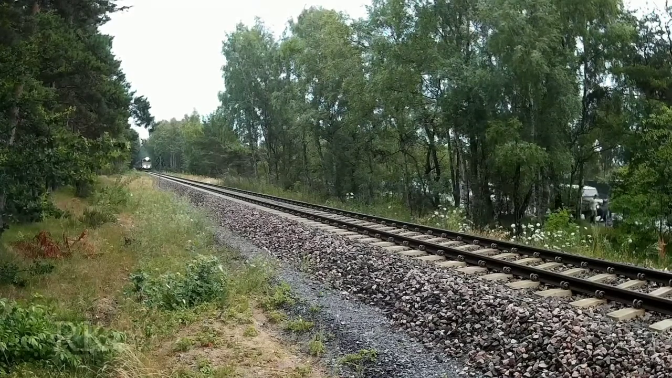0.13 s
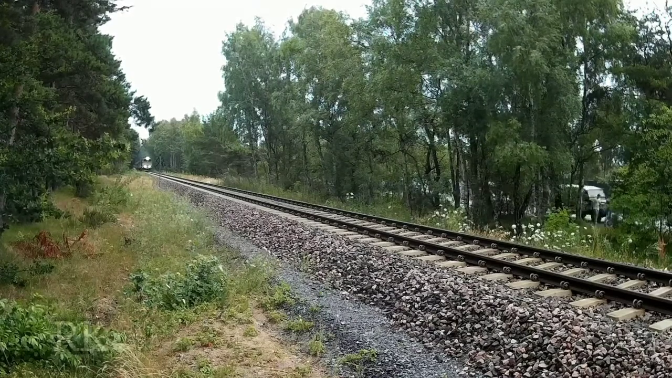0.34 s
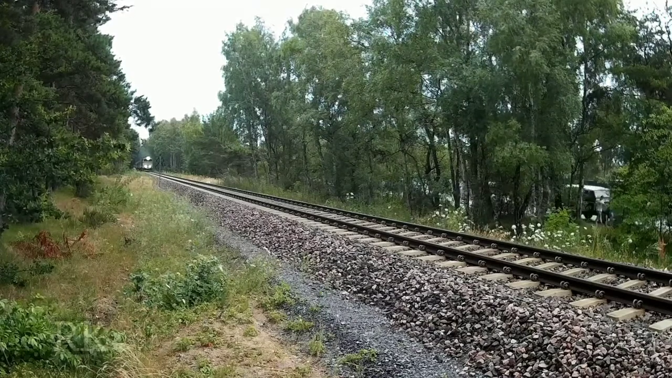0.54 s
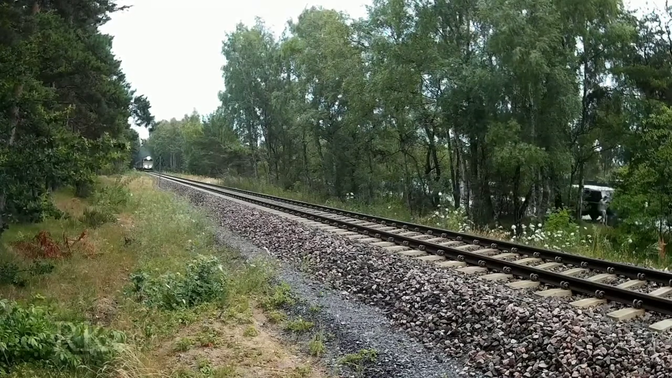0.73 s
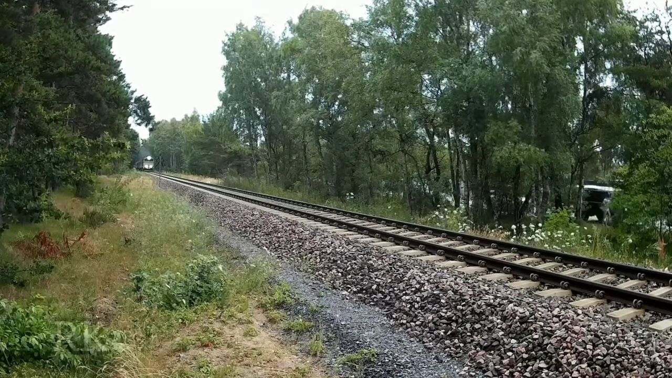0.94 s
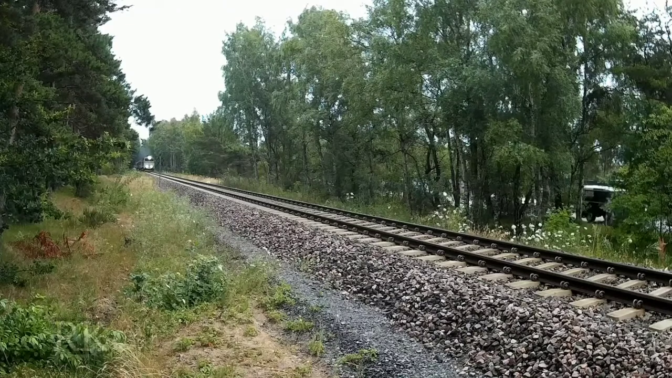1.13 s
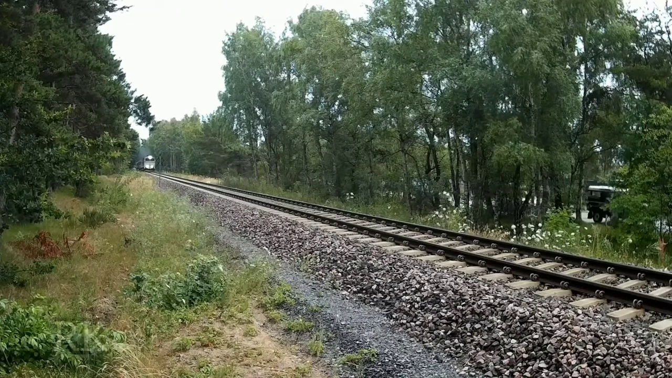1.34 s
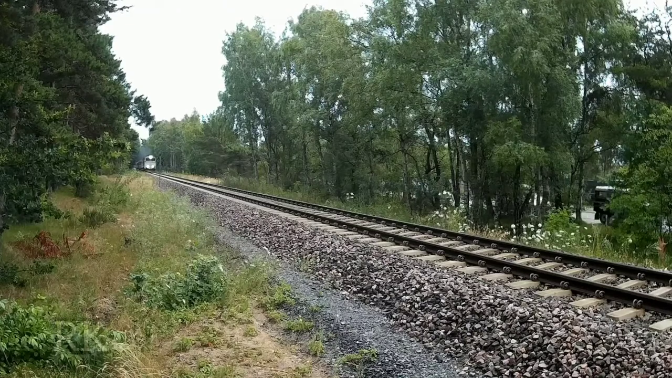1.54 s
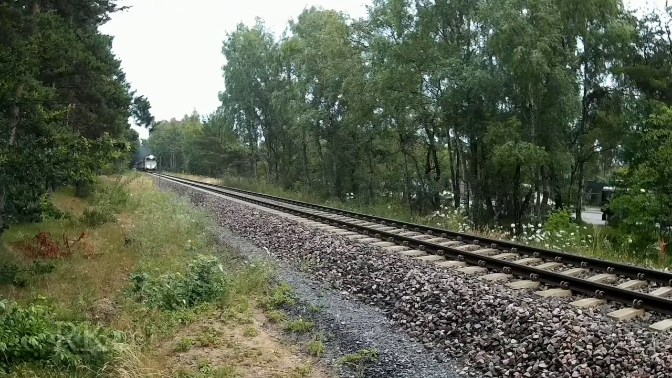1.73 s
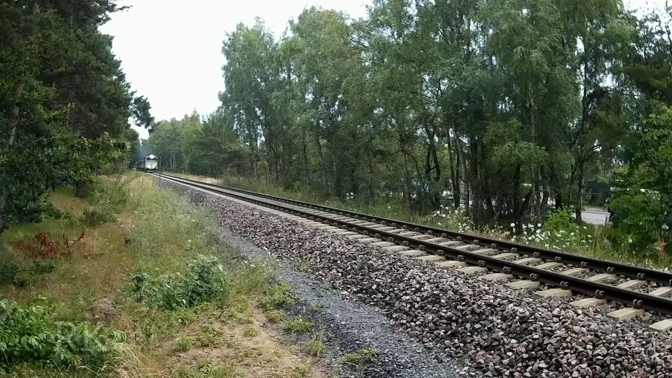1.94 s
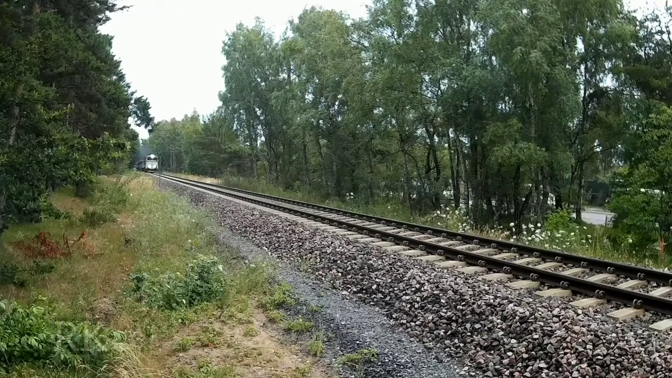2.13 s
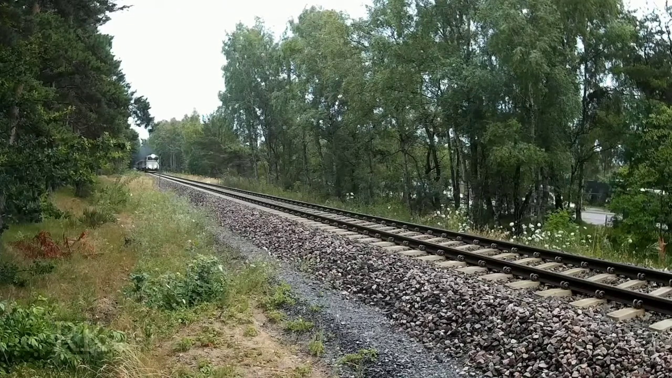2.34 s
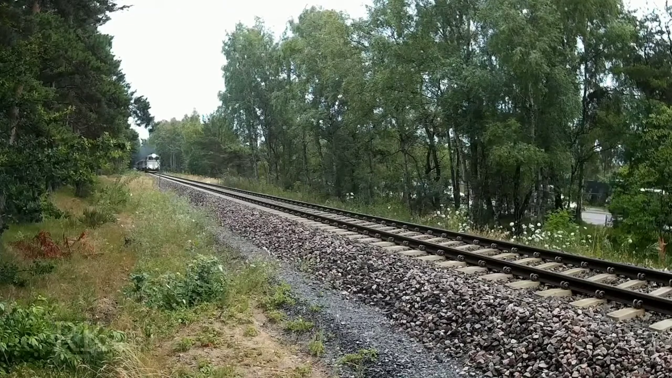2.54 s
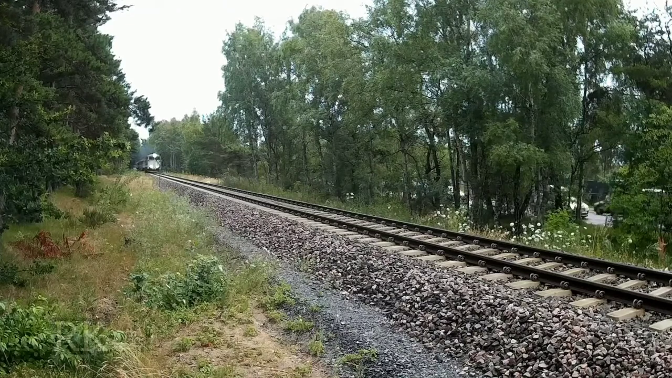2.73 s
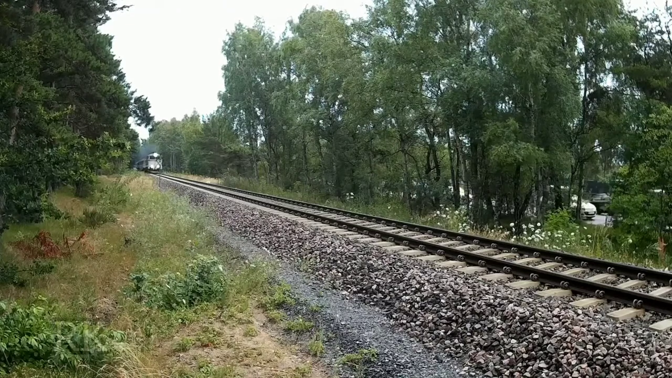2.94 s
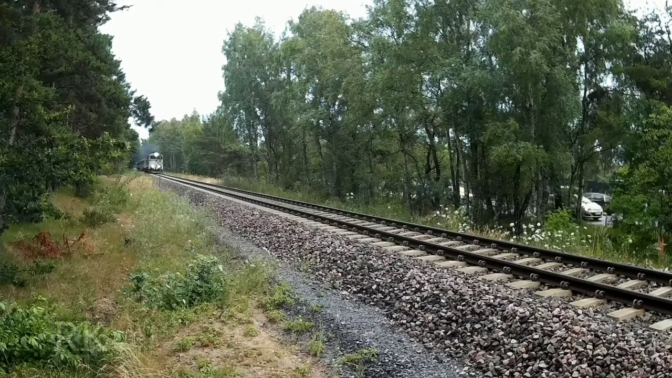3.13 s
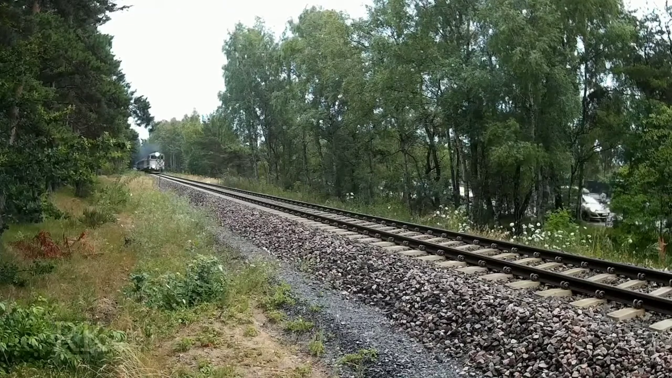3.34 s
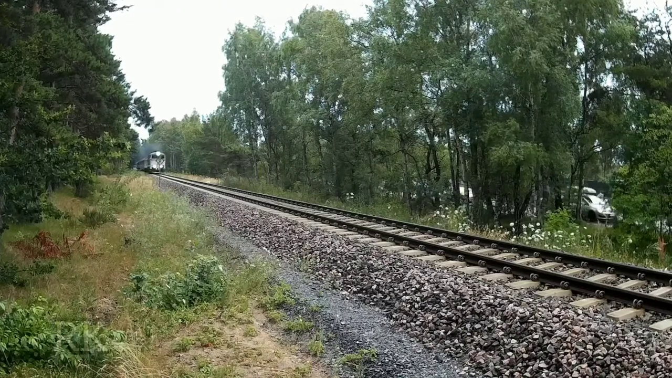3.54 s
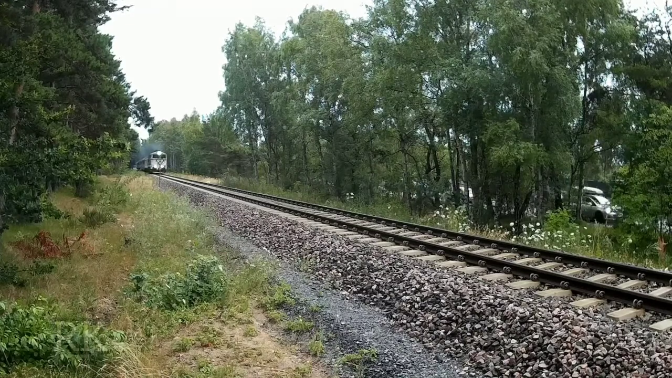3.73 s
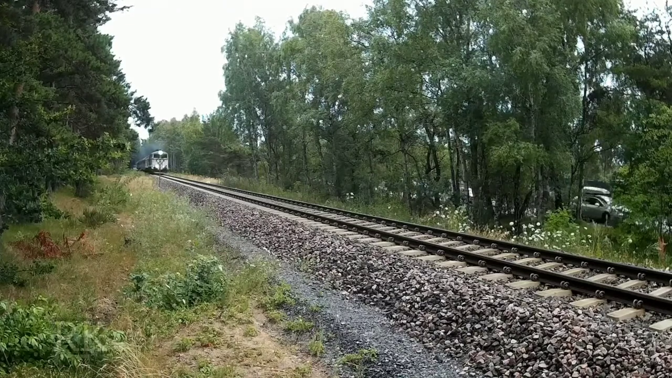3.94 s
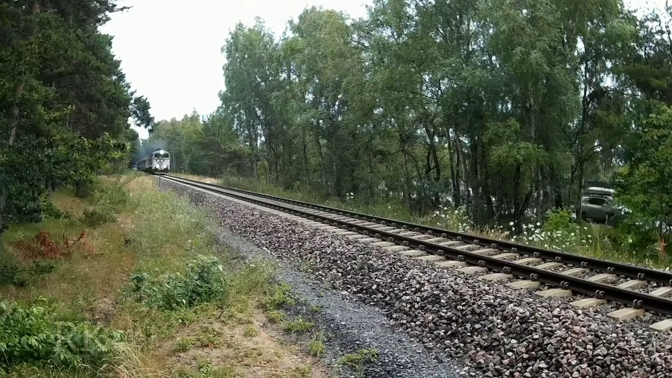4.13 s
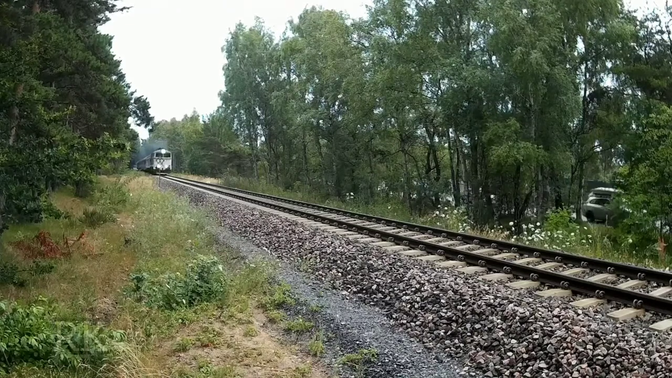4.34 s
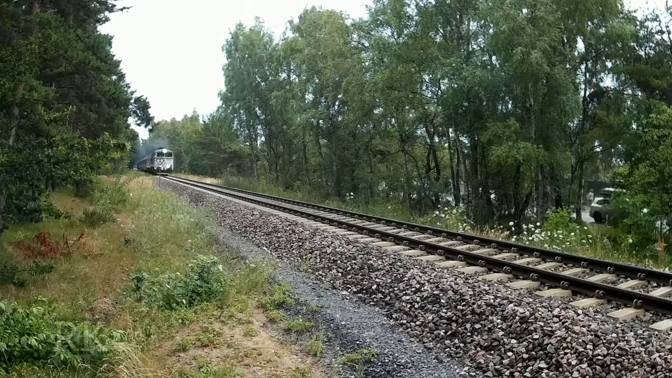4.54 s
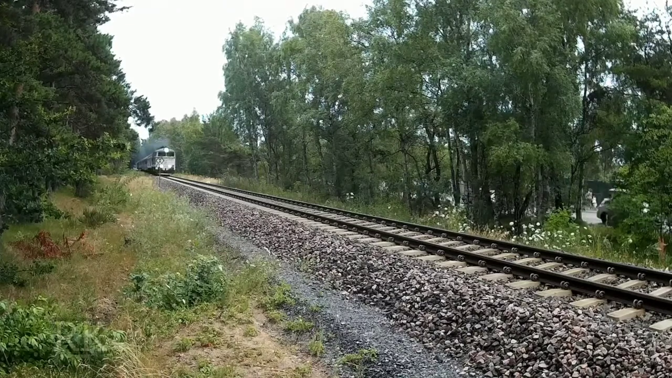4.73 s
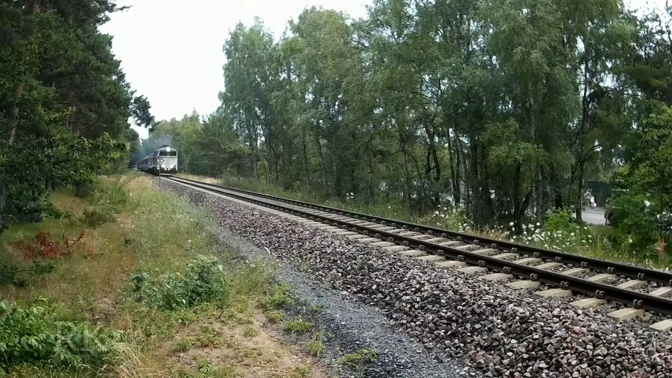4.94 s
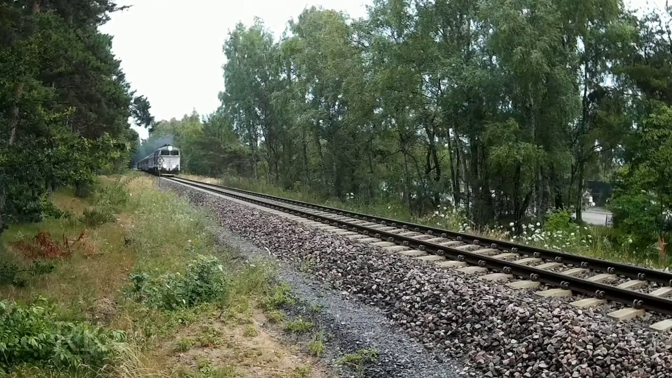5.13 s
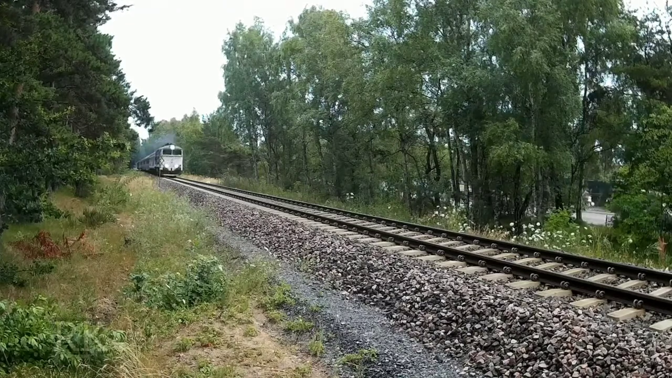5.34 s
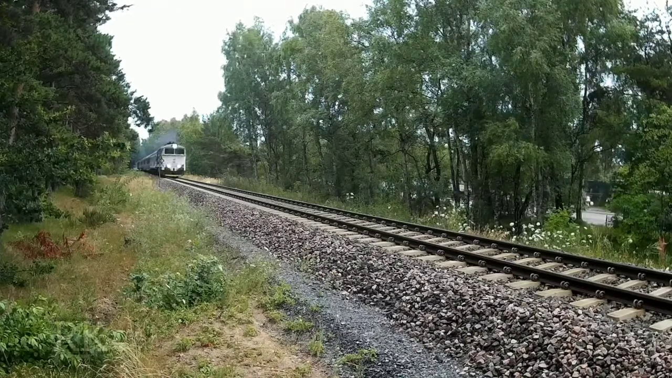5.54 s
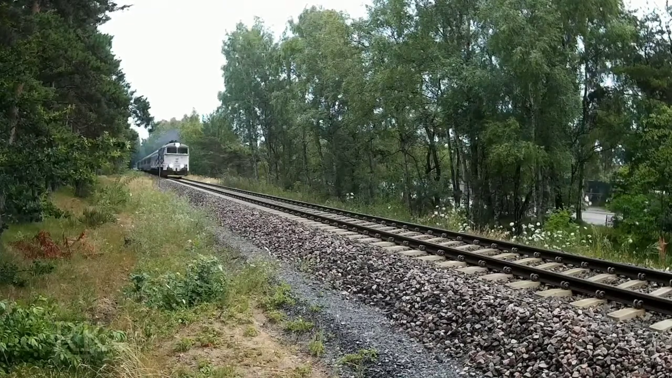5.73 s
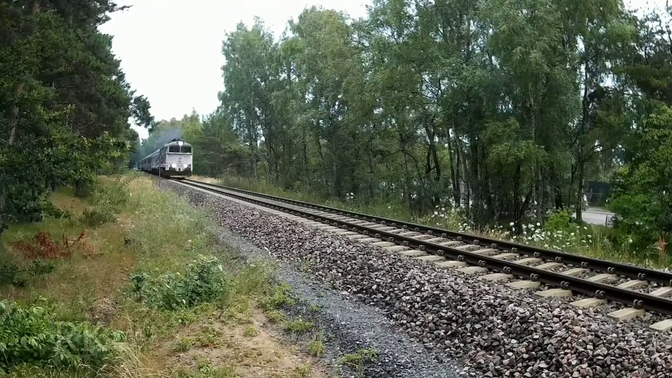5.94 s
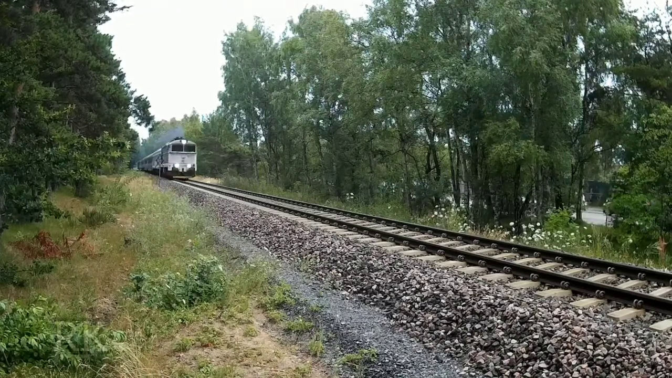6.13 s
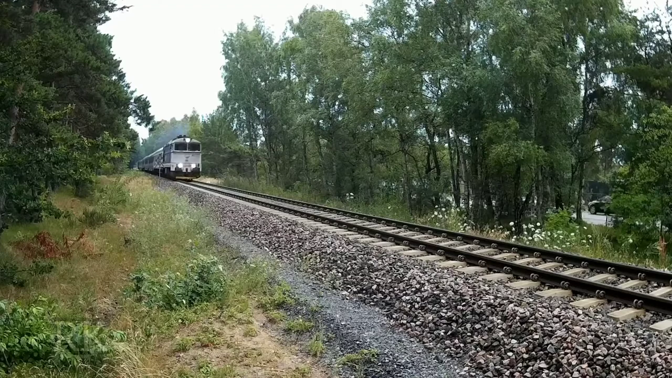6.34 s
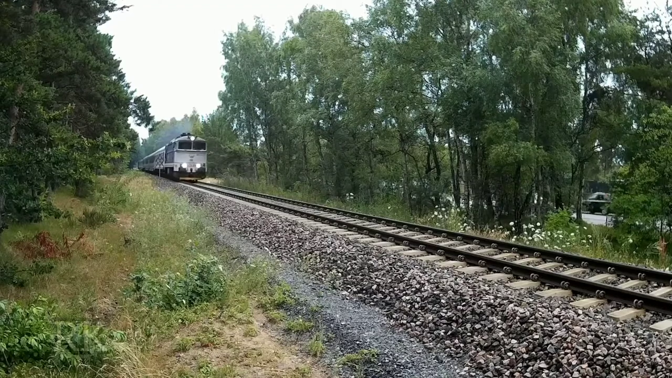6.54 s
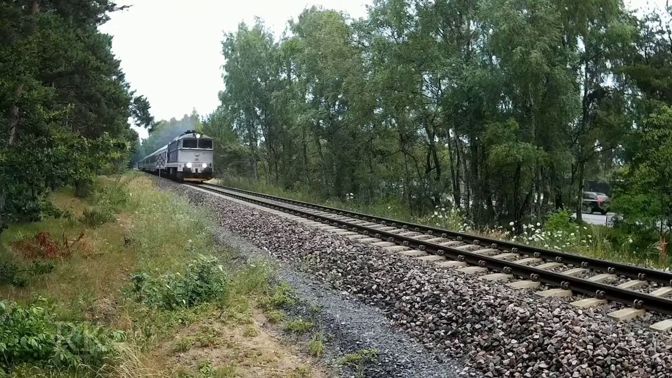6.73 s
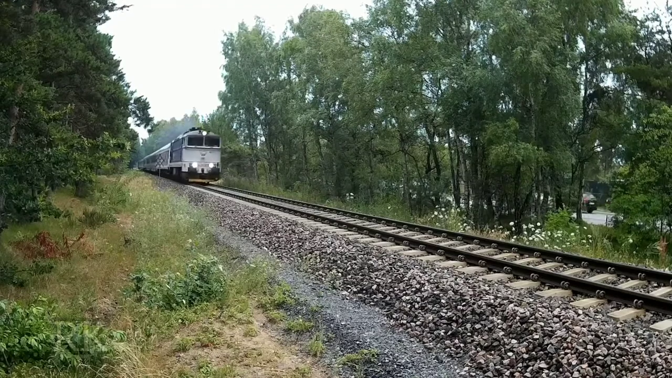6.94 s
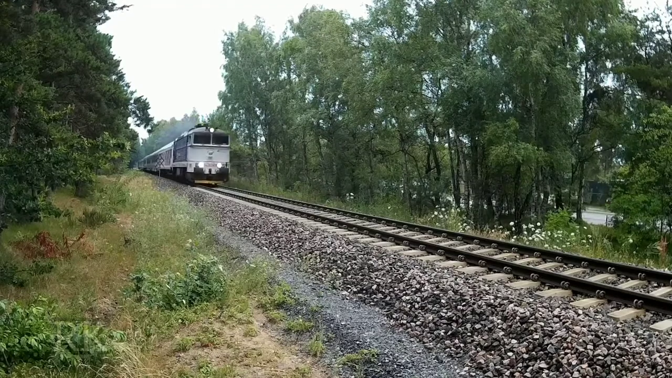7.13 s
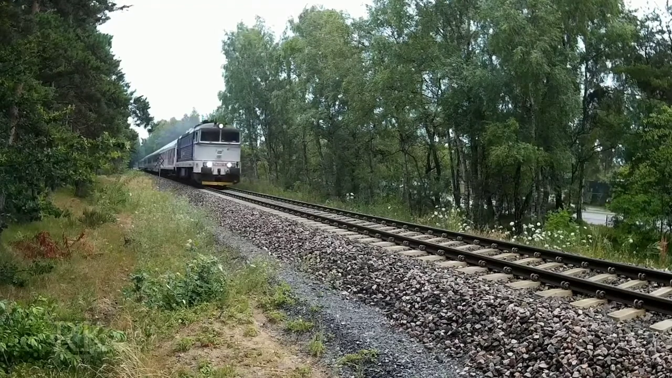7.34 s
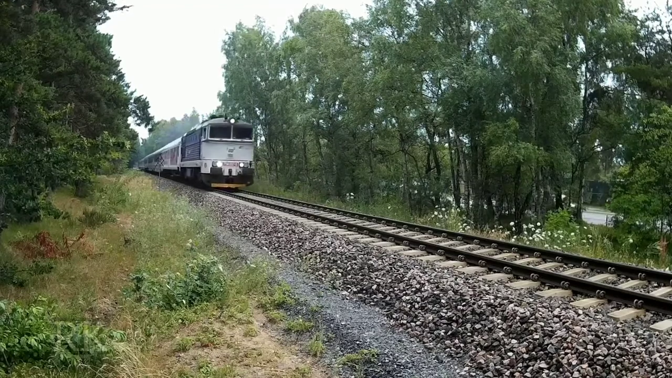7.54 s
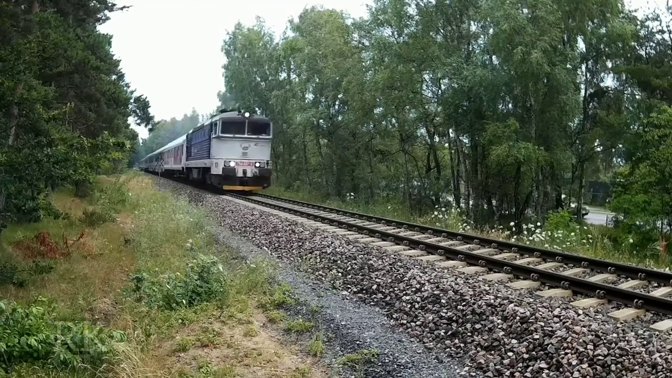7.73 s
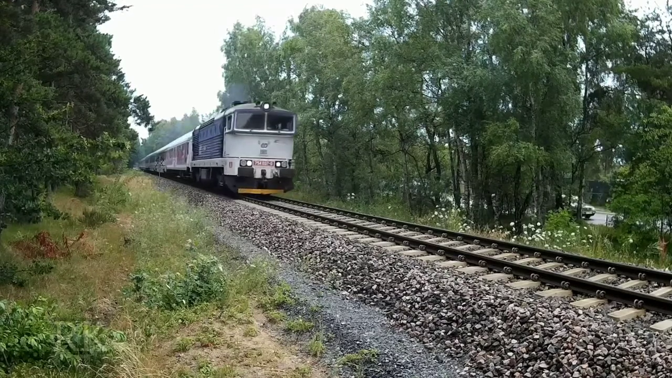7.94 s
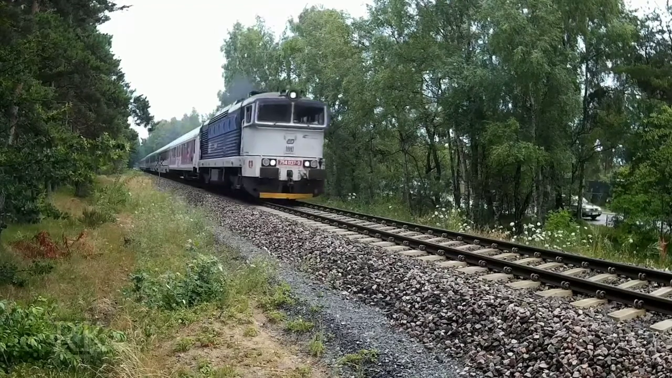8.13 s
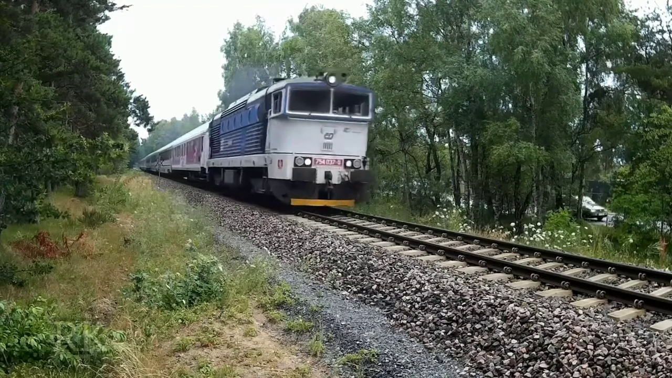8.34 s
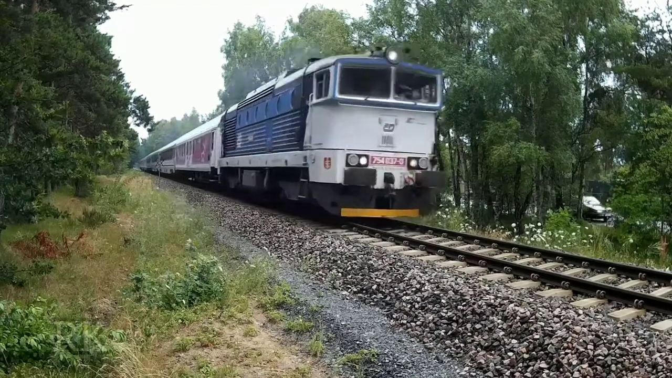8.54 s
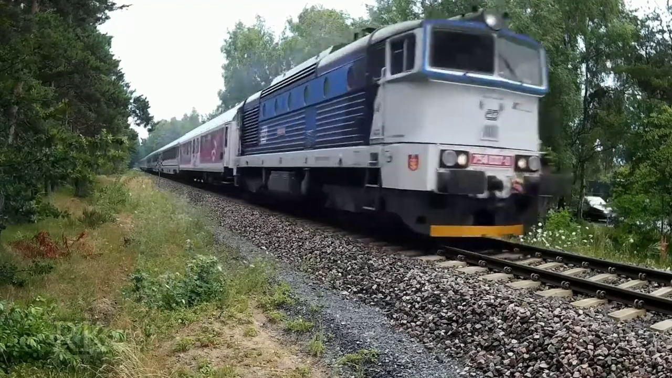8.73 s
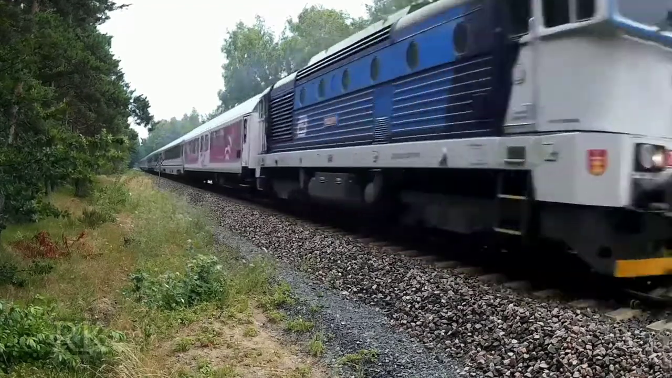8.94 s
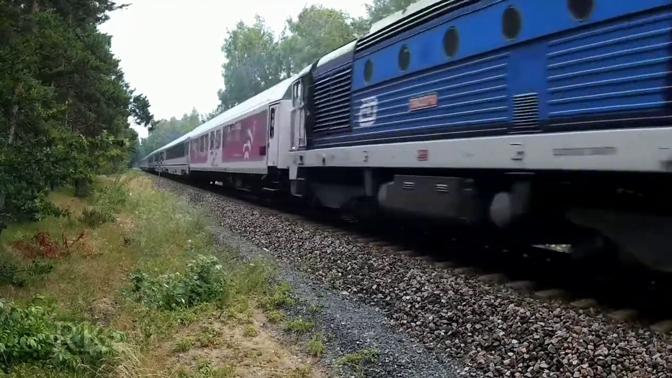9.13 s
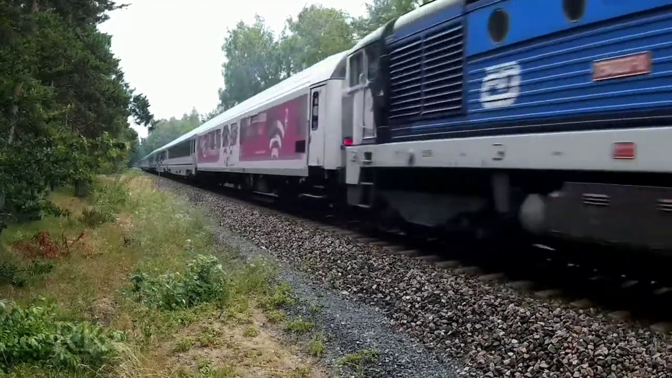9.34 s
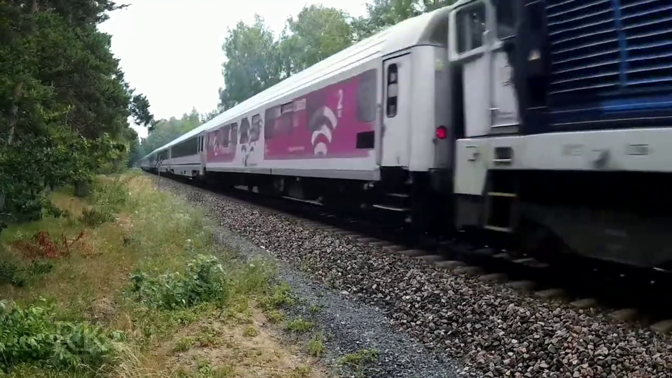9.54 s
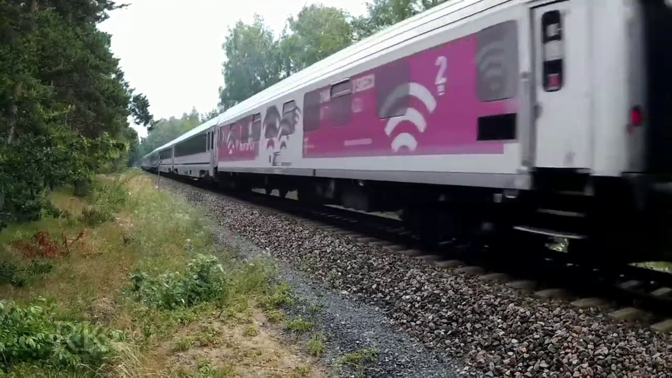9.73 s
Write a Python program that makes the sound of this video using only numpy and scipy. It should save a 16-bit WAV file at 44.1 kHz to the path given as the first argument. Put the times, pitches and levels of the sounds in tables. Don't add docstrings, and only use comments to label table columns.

```python
import sys
import numpy as np
from scipy import signal
from scipy.io import wavfile
from scipy.ndimage import uniform_filter1d, minimum_filter1d

SR = 44100
rng = np.random.default_rng(int(sys.argv[2]) if len(sys.argv) > 2 else 0)


def field_ratio(decibels):
    return 10 ** (np.asarray(decibels, dtype=float) / 20)


def transcribe(signal):
    frames = np.atleast_2d(signal).T
    limited = np.clip(frames, -1, 1)
    pcm = np.round(limited * 32767).astype(np.int16)
    wavfile.write(sys.argv[1], SR, pcm)


N = 430857

SPEED_M_S, SIDEWAYS_M, SOUND_M_S = 17.5, 4.0, 343
GEAR_GAIN, ENGINE_SAG, AT_S = .0042, -.0009, 8.3
CYCLE_HZ, STACK_S = 8.147, 9.45
MESH_HZ = 504


def evened(x):
    return x / np.sqrt(np.mean(x ** 2) + 1e-20)


def read(points, hz):
    point_hz, value = np.transpose(points)
    return np.interp(np.log(hz + 1), np.log(point_hz + 1), value)


def bump(t, centre_s, half_s):
    return np.exp(-((t - centre_s) / half_s) ** 2)


def drift(count, size, step=1):
    width = max(size // 256, 1)
    coarse = uniform_filter1d(rng.standard_normal((count, N // 256 + 2)), width, axis=1)
    coarse = evened(uniform_filter1d(coarse, width, axis=1))
    at = np.arange(0, N, step) / 256
    return np.array([np.interp(at, np.arange(len(curve)), curve) for curve in coarse])


def heard_turns(hz, passing_s, gain_per_s):
    t = np.arange(N) / SR
    along = SPEED_M_S * (t - passing_s)
    receding = SPEED_M_S * along / np.hypot(along, SIDEWAYS_M)
    doppler = 1 / (1 + receding / SOUND_M_S)
    return 2 * np.pi * np.cumsum(hz * doppler * (1 + gain_per_s * (t - AT_S))) / SR


# time_s, level_db
NEARNESS = [(0.0, -54), (0.5, -55), (0.8, -54.5), (0.88, -53), (2.25, -50.5), (3.95, -47.5), (4.2, -44.5),
            (5.3, -43), (6.1, -41.5), (7.0, -38.5), (8.0, -34), (8.6, -29.5), (8.76, -27), (8.85, -23.5),
            (9.1, -25), (9.4, -24.5), (9.55, -23.5), (9.77, -26)]
NEARNESS_STEPS = [-58, -45, -35, -24]


def level_of(law_db, swells, t):
    nearness_db = np.interp(t, *np.transpose(NEARNESS))
    level_db = np.interp(nearness_db, NEARNESS_STEPS, np.broadcast_to(law_db, len(NEARNESS_STEPS)))
    for centre_s, swell_db in swells:
        half_s = .045 + 0.026 * max(8.96 - centre_s, 0)
        level_db = level_db + swell_db * bump(t, centre_s, half_s)
    return level_db


# time_s, half_length_s, level_db
GUSTS = [(.93, 0.086, 1.5), (1.2, 0.066, -0.5), (1.494, 0.094, 2.5), (1.7, 0.087, -1), (1.923, 0.064, 1.5),
         (2.06, 0.034, -2.5), (2.522, 0.037, -2.5), (2.626, 0.045, 0.5), (2.813, 0.025, 1.5),
         (2.86, 0.025, -2), (3.25, 0.13, -1), (3.48, 0.023, -4), (3.568, 0.042, 1.5), (5.22, .06, 1.5),
         (6.2, 0.11, 0)]


def gusty_air():
    t = np.arange(0, N, 64) / SR
    gusts_db = sum(db * bump(t, centre_s, half_s) for centre_s, half_s, db in GUSTS)
    return field_ratio(np.interp(np.arange(N) / SR, t, gusts_db))


# law_db at the nearness steps, then swells of time_s, level_db
ROLLING = [
    ([-46, -43.5, -36, -20.5], [(.2, -3), (.7, -3), (1.0, 5), (1.5, -3), (2.3, 3), (2.8, 3), (3.97, 2), (4.7, -3), (5.41, 5), (5.66, -11), (6.12, 6), (8.8, 1), (8.98, 0.5), (9.1, -1), (9.22, 6.5), (9.47, 8)]),
    ([-51.5, -46, -28, -15.5], [(.4, -2), (1.55, 0), (2.04, -2), (3.45, 5), (4.5, 3), (5.66, 0.5), (6.23, -3), (8.93, -2.5), (9.02, -3), (9.22, -2), (9.36, 2), (9.46, 3), (9.56, -2), (9.65, -1.5)]),
    ([-50, -36.5, -27.5, -17], [(1.0, 1), (1.9, 1), (3.3, -0.5), (8.73, 2), (8.79, -2.5), (9.01, -1.5), (9.1, -2), (9.22, -2), (9.53, 3), (9.77, 4)]),
    ([-59, -45.5, -34, -23], [(0.0, 0), (8.93, 1), (9.1, 0)]),
]
SPLITS = [180, 720, 2100]
# pitch_hz, level_db per Hz
FAR = [(7.1, -38), (12, -3), (53, 7.5), (162, -5.5), (362, 4.5), (584, -7), (861, -6.5), (1000, -2),
       (1130, -6.5), (1520, -11), (2240, -24), (3510, -18.5), (4190, -24.5), (11900, -45.5), (15200, -57)]
# pitch_hz, level_db per Hz
MID = [(7.1, -42), (12, -3), (53, -2), (116, -16), (567, -10), (678, -5.5), (764, -12), (1030, -1.5),
       (1160, -5.5), (1560, -13.5), (2170, -26), (3510, -24.5), (5020, -33.5), (11900, -53.5), (15200, -61)]
# pitch_hz, level_db per Hz
NEAR = [(7.1, -48), (12, -22), (131, -22), (237, -6), (431, -8), (531, -5.5), (580, -1), (881, -12),
        (1020, -1.5), (1190, -11), (1600, -18.5), (2220, -29.5), (3580, -30), (9880, -52.5), (15000, -63.5)]
# pitch_hz, level_db per Hz
COACH = [(7.1, -47), (12, -18), (116, -26), (252, -4.5), (406, -13.5), (500, -4), (674, -9.5), (993, -2.5),
         (1220, -10), (1550, -11), (2360, -23.5), (3480, -25.5), (4830, -30.5), (12200, -51.5),
         (15000, -61)]
STAGES = [3.002, 7.202, 9.002, 9.72]
# pitch_hz, width_hz, lift_db
TUBE = [(985, 107, 4), (1570, 670, 3), (3457, 720, 8), (5670, 910, 6), (7790, 460, 6.5), (9830, 770, 7),
        (12000, 1100, 7.5)]
TUBE_DEPTH = [1.13, 1.01, 0.97, 0.86]
# time_s, pitch_hz, lift_db
WHEELS = [(5.18, 1350, 7), (8.83, 3170, 3.5), (8.95, 3600, -0.5), (9.5, 3100, 5.5), (9.62, 3200, 3),
          (9.7, 4600, 1), (9.76, 4800, 6), (9.3, 14500, 12), (9.45, 14500, 12), (9.6, 14500, 6),
          (9.75, 15000, 14)]


def rough_texture(patchy_db=0.65, gust_db=0.5):
    frames, hz = N // 128 + 6, np.fft.rfftfreq(512, 1 / SR)
    a, b, patches = rng.standard_normal((frames, len(hz), 3)).T
    patches = evened(uniform_filter1d(uniform_filter1d(patches, 8, 0), 16, 1))
    shimmer = evened(uniform_filter1d(rng.standard_normal(frames), 12))
    treble = np.clip(hz / 2500, 0, 1)[:, None]
    texture = field_ratio(patchy_db * patches + gust_db * shimmer * treble)
    return evened(signal.istft((a + 1j * b) * texture, nperseg=512, noverlap=384)[1][:N])


def rolling_colour(hz, t):
    tube_db = sum(db / (1 + (2 * (hz - mode_hz) / width_hz) ** 2) for mode_hz, width_hz, db in TUBE)
    colour_db = 0
    for points, depth, pick in zip((FAR, MID, NEAR, COACH), TUBE_DEPTH, np.eye(len(STAGES))):
        share = np.interp(t, STAGES, pick)
        colour_db = colour_db + np.outer(read(points, hz) + depth * tube_db, share)
    wheel_s, wheel_hz, lift_db = np.transpose(WHEELS)[:, :, None]
    band = np.exp(-((hz / wheel_hz - 1) * 8) ** 2)
    return field_ratio(colour_db + band.T @ (lift_db * bump(t, wheel_s, 0.098)))


def rolling(trims_db=(-5, -2, -1, 0)):
    hz, t, z = signal.stft(rough_texture(), SR, nperseg=2048, noverlap=1792)
    colour = rolling_colour(hz, t)
    above = [1 / (1 + (split_hz / (hz + 1)) ** 8) for split_hz in SPLITS]
    shares = -np.diff([np.ones(len(hz)), *above, np.zeros(len(hz))], axis=0)
    out = np.zeros(N)
    for share, part, trim_db in zip(shares, ROLLING, trims_db):
        shape = colour * np.sqrt(np.maximum(share, 0))[:, None]
        shape = shape / np.sqrt((shape ** 2).mean(0))
        layer = signal.istft(z * shape, nperseg=2048, noverlap=1792)[1][:N]
        level_db = np.interp(np.arange(N) / SR, t, level_of(*part, t))
        out += layer * field_ratio(level_db + trim_db)
    return out


FAN_LAW = [-63, -48, -37.5, -30.5]
# time_s, level_db
FAN_SWELLS = [(4.95, 3), (5.25, 2), (5.55, 0), (5.85, 6), (6.15, 7.5), (6.75, -2), (7.2, 4), (8.5, 3),
              (9.7, -4)]


def fan(order=54.7, wobble_rad=1.3):
    turns = order * heard_turns(CYCLE_HZ, STACK_S, ENGINE_SAG)
    turns = turns + wobble_rad * drift(count=1, size=5000)[0]
    level_db = level_of(FAN_LAW, FAN_SWELLS, np.arange(N) / SR) - 5
    return np.sqrt(2) * field_ratio(level_db) * np.cos(turns)


def whine(hz, passing_s, partials, heard_s, wobble_rad=.4, flutter_db=.7, trim_db=1.5):
    step = 8
    t = np.arange(0, N, step) / SR
    turns = heard_turns(hz, passing_s, GEAR_GAIN)[::step]
    shake = drift(count=6, size=2600, step=step)
    unsteady = np.clip(passing_s - t, 1, 2.5)
    opens = np.clip((t - heard_s[0]) / 0.036 + .5, 0, 1)
    closes = np.clip((heard_s[1] - t) / 0.16 + 1, 0, 1)
    tones = 0
    for k, part in enumerate(partials):
        level_db = level_of(*part, t) + trim_db + unsteady * flutter_db * shake[k]
        tones = tones + field_ratio(level_db) * np.cos((k + 1) * turns + unsteady * wobble_rad * shake[k + 3])
    return signal.resample_poly(np.sqrt(2) * opens * closes * tones, step, 1)[:N]


# partial (number), level_db under the air hiss
OVERTONES = [(4, -24), (5, -23), (6, -23), (7, -21), (8, -33)]


def overtones(waver_db=3.0, wobble_rad=1.2):
    turns = heard_turns(MESH_HZ, AXLES[2], GEAR_GAIN)
    waver = drift(count=len(OVERTONES), size=8000)
    tones = 0
    for (k, db), loudness, bend in zip(OVERTONES, waver, waver[::-1]):
        tones = tones + field_ratio(db + waver_db * loudness) * np.cos(k * turns + wobble_rad * bend)
    hiss_db = np.interp(np.arange(N) / SR, *np.transpose(NEARNESS))
    return np.sqrt(2) * field_ratio(hiss_db) * tones


# law_db at the nearness steps, then swells of time_s, level_db
TRAILING = [([-70, -63.5, -47.5, -35], [(0.0, 0), (1.5, 4), (7.07, 8), (8.35, 10), (8.82, 8)]),
            ([-57, -49.5, -31, -34], [(1.65, 0), (4.25, -1), (5.0, 5), (5.5, 7), (7.1, 5), (7.3, -11),
            (7.82, 2.5), (8.05, 3), (8.8, -10)]), ([-72, -54, -43.5, -28], [(2.75, 6), (5.75, 1),
            (8.05, -4)])]
FIRST = [(-29.5, [(8.92, 14), (9.08, 11.5), (9.24, -6), (9.6, -8)]), (-23, [(8.93, 11), (9.0, 8),
         (9.08, -3), (9.16, 9), (9.24, -5), (9.71, -19)]), (-37, [(8.93, 15), (9.05, 9.3), (9.72, 4)])]
SECOND = [(-28.5, [(9.16, 3), (9.32, 1), (9.48, -17), (9.6, -8)]), (-25.5, [(9.2, 2.7), (9.31, 7.8),
          (9.39, 9.2), (9.5, 5), (9.75, 5.6)]), (-41, [(9.24, 9.9), (9.4, 4), (9.72, 3)])]
THIRD = [([-66.5, -61.5, -39.5, -24.5], [(7.0, 8), (7.5, -5), (7.9, 7), (8.3, 5), (8.68, 8.5), (8.92, 0),
         (8.99, -7), (9.05, 9.5), (9.13, 12.5), (9.24, 4.5), (9.55, 3.5), (9.64, 5), (9.73, 6)]),
         ([-65.5, -47, -29, -28], [(.5, -3), (1.3, 8.5), (2.0, 5.5), (5.25, 5), (5.75, 10), (6.25, 2),
         (6.62, 5.5), (7.45, 3), (7.75, 4), (7.9, -16), (8.76, 8), (9.0, 10), (9.12, -2)]),
         ([-79, -59, -44, -36.5], [(5.9, 3.4), (7.6, 3), (8.2, 4), (8.65, 3), (8.8, 5.7), (8.88, 9.6),
         (9.36, 4.4)])]
FOURTH = [(-33, [(9.56, -11)]), (-27.5, [(9.54, 12), (9.62, 10)]), (-32, [(9.56, -2)])]
AXLES = [9.16, 9.3, 9.7, 9.84]
# from_s, to_s
HEARD = [
    (8.88, 9.9),
    (9.12, 9.9),
    (0, 9.9),
    (9.44, 9.9),
    (0, 8.86),
]


def gears():
    axles = zip(AXLES, (FIRST, SECOND, THIRD, FOURTH), HEARD)
    driven = sum(whine(MESH_HZ, *axle) for axle in axles)
    trailing = whine(489.5, 10.6, TRAILING, HEARD[-1])
    return driven + trailing + overtones()


# multiple of the engine cycle (ratio), far_db, near_db
FIRING = [(2, -12, -19), (3, -8, -10), (5, -10, -15), (6, 0, 0), (7, -7, -15), (9, -12, -6), (12, -17, -14),
          (15, -19, -19), (18, -22, -11), (21, -13, -18), (23, -23, -26), (25, -16, -21), (26, -18, -16),
          (27, -11, -18), (29, -16, -18), (31, -18, -22), (32, -18, -27), (33, -12, -14), (34, -13, -15),
          (35, -11, -12), (36, -16, -17), (37, -9, -10), (39, -8, -11), (40, -16, -18), (41, -13, -20),
          (42, -14, -12), (43, -9, -10), (44, -11, -14), (45, -12, -18), (46, -13, -18)]
EXHAUST_LAW = [-59, -43.5, -35, -31]
# time_s, level_db
EXHAUST_SWELLS = [(.6, 0), (.9, -6), (2.3, 1.5), (4.2, 0.5), (4.8, -3), (8.55, 5.5), (9.0, -16),
                  (9.37, 2.5), (9.77, -6)]


def exhaust(waver_db=1.3, near_from_s=2.2, near_at_s=7.0):
    step = 16
    t = np.arange(0, N, step) / SR
    turns = heard_turns(CYCLE_HZ, STACK_S, ENGINE_SAG)[::step]
    near = np.clip((t - near_from_s) / (near_at_s - near_from_s), 0, 1)
    order, far_db, near_db = np.transpose(FIRING)[:, :, None]
    waver = drift(count=len(FIRING), size=9000, step=step)
    start = 2 * np.pi * rng.random((len(FIRING), 1))
    balance_db = far_db + near * (near_db - far_db)
    level_db = balance_db + waver_db * waver + level_of(EXHAUST_LAW, EXHAUST_SWELLS, t)
    tones = np.sqrt(2) * field_ratio(level_db) * np.cos(order * turns + start + 0.32 * waver[::-1])
    return signal.resample_poly(tones.sum(0), step, 1)[:N]


def scene():
    train = (rolling() + fan() + gears()) * gusty_air() + exhaust()
    return np.array([train, train])


MUTES = [3.9775, 7.9775]


def buffer_mutes(fade_in_s=0.029):
    t = np.arange(N) / SR
    since = [np.where(t < mute_s, 1, np.clip((t - mute_s) / fade_in_s, 0, 1)) for mute_s in MUTES]
    return uniform_filter1d(np.prod(since, axis=0), size=12)


def thin_treble(x, side_db=-18, side_from_db=-52, side_luck_db=7.0):
    hz, t, z = signal.stft(x, SR, window="cosine", nperseg=2048, noverlap=1024)
    pitch = hz[:, None]
    power = abs(z) ** 2 + 1e-16
    loud_db = 10 * np.log10(power.sum(0)) + 40
    need_db = -6.5 + 4 * (pitch - 13000) / 1000 + .22 * loud_db + 4 * rng.standard_normal(len(t))
    around = uniform_filter1d(power, size=61, axis=0)
    stands_db = 10 * np.log10(uniform_filter1d(power, size=5, axis=0) / around)
    kept = z * (stands_db > np.minimum(need_db, 3.5))
    band_db = 10 * np.log10(uniform_filter1d(power, size=16, axis=0)) + 8 * np.log2((pitch + 1) / 3000)
    luck = np.repeat(rng.standard_normal((len(hz) // 12 + 1, len(t))), 12, axis=0)[:len(hz)]
    leaning = (band_db + side_luck_db * luck > side_from_db) * ((pitch > 1650) & (pitch < 6000))
    side = field_ratio(side_db) * kept * leaning * np.exp(1.2j * luck[::-1])
    pair = [kept - side, kept + side]
    return signal.istft(pair, SR, window="cosine", nperseg=2048, noverlap=1024)[1][:, :N]


def roll_off(x):
    return signal.sosfilt(signal.butter(12, 15310, fs=SR, output="sos"), x)


def record(dry):
    x = dry[0] * buffer_mutes() + field_ratio(-71.5) * rng.standard_normal(N)
    crest = -minimum_filter1d(-abs(x), size=257)
    x = x / np.maximum(uniform_filter1d(crest, size=257) / .95, 1)
    mix = thin_treble(x)
    return roll_off(mix)


dry = scene()
out = record(dry)
transcribe(out)
```